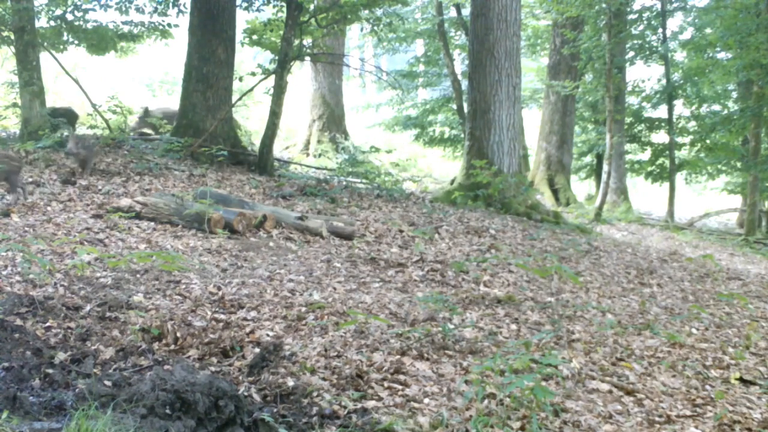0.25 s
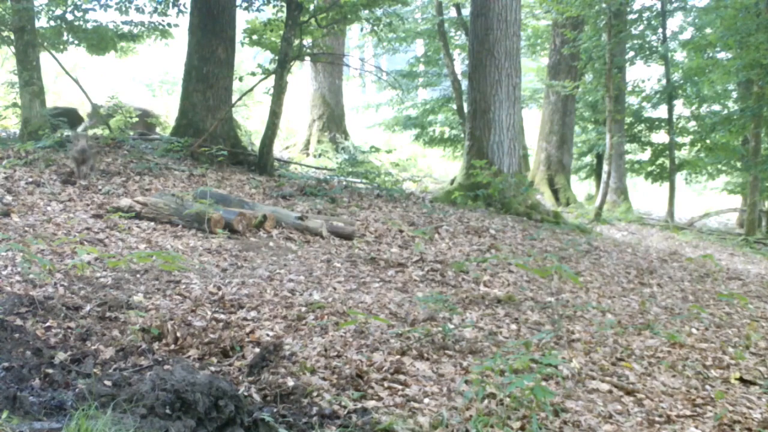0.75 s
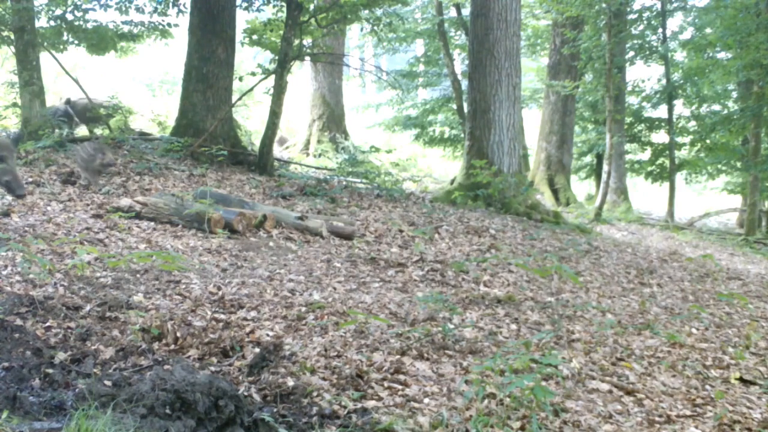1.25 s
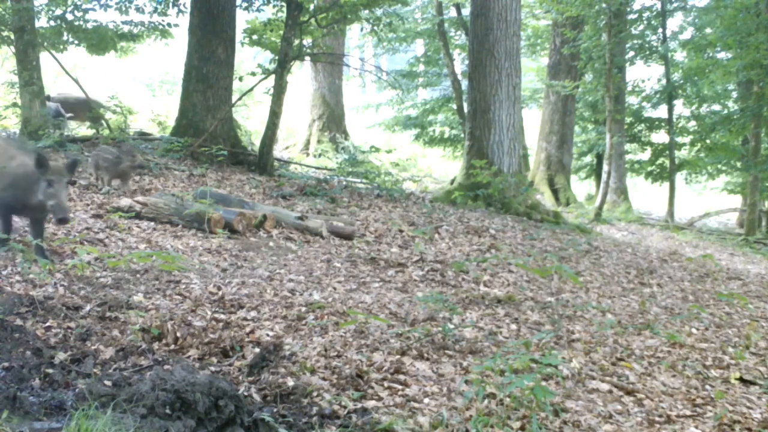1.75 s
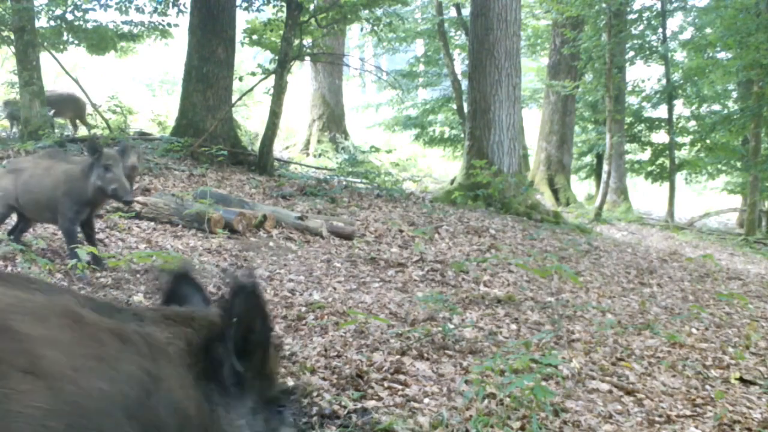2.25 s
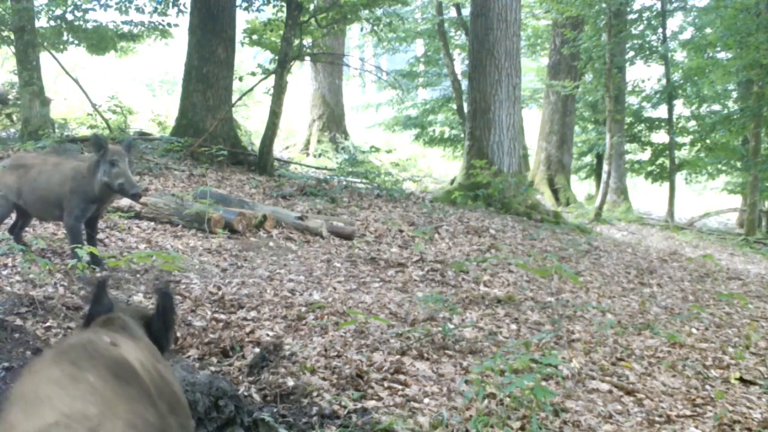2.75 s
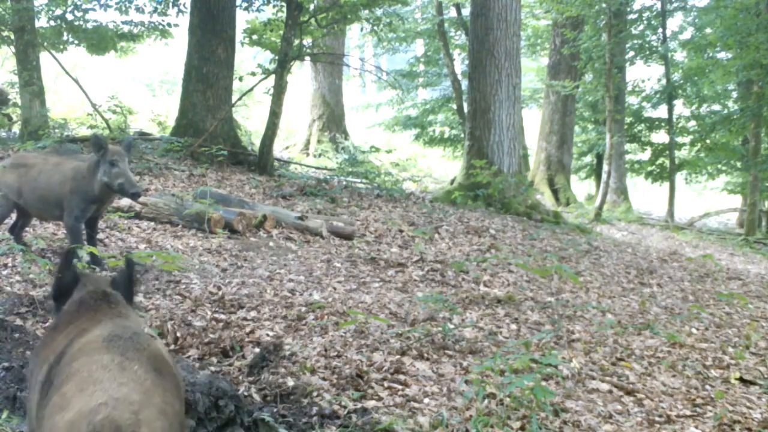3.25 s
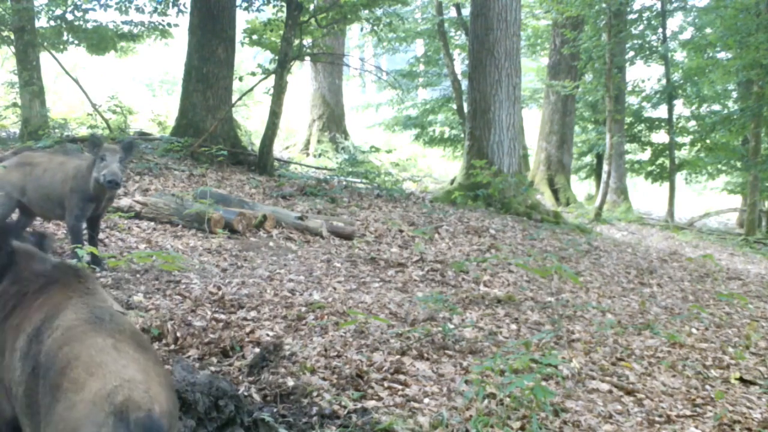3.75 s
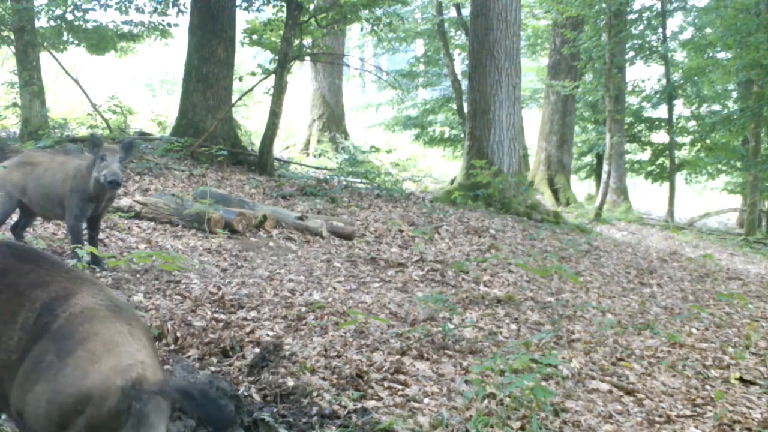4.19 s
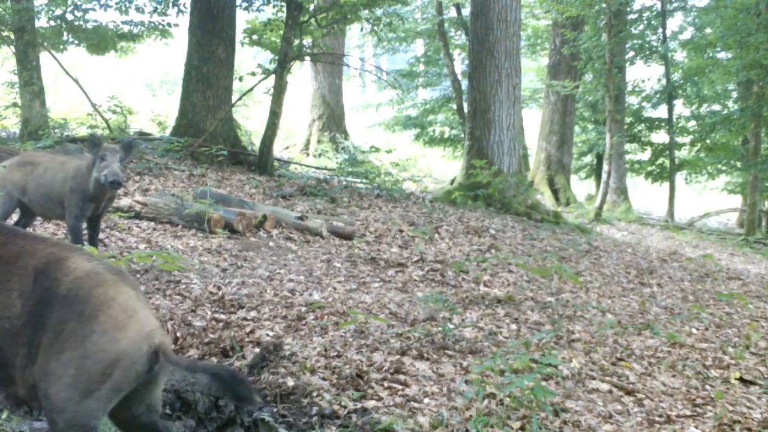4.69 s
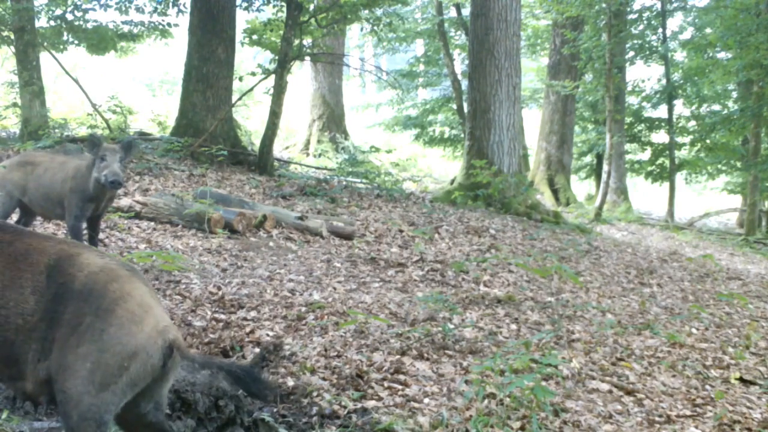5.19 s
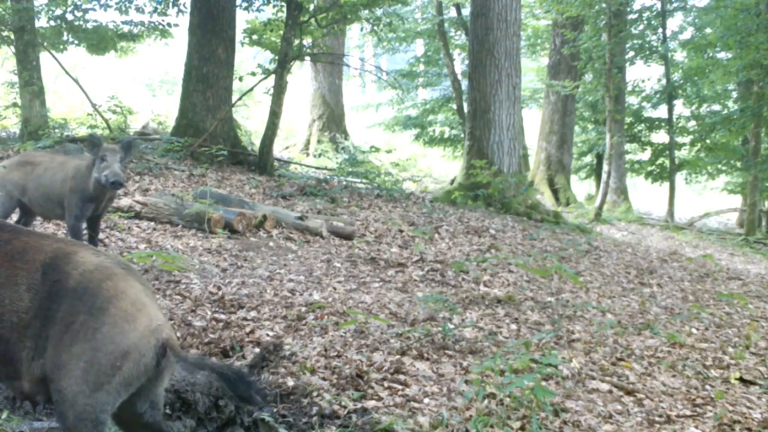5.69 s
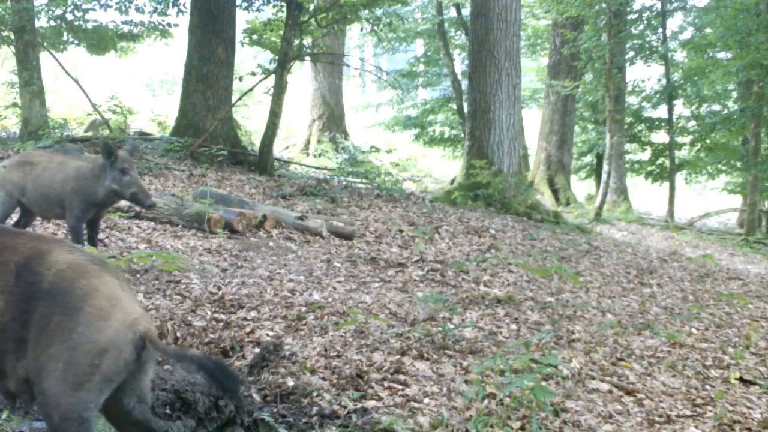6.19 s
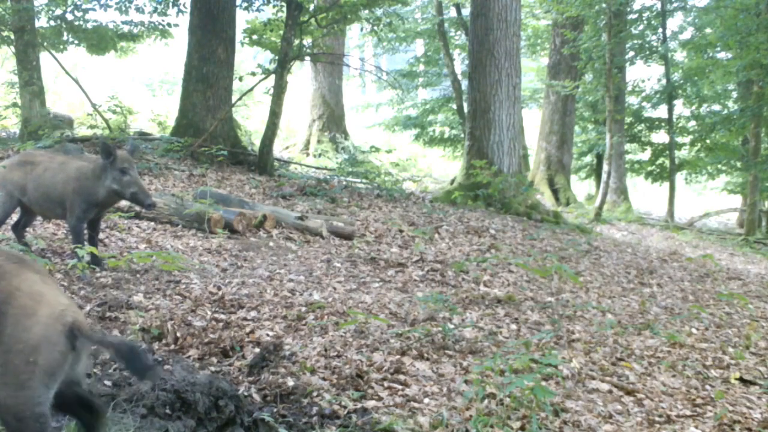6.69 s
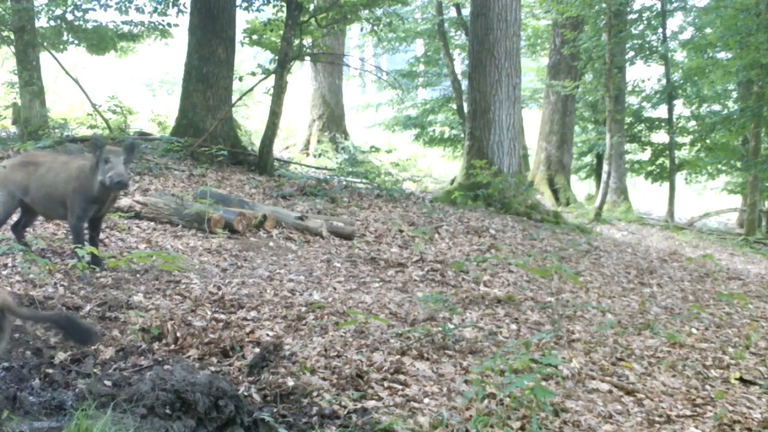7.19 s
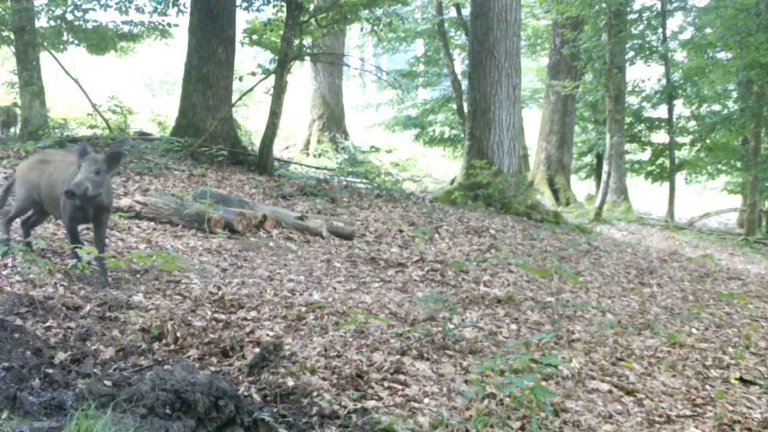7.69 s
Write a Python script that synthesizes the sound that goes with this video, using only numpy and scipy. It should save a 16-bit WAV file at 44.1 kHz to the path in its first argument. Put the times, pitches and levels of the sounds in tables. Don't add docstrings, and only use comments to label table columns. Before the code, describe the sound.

Wild boars rustle through dry leaves and snort close by, bumping the microphone housing with hard knocks before settling into sparse crackles and faint birdsong.

```python
import sys
import numpy as np
from scipy import signal
from scipy.io import wavfile

SR = 44100
rng = np.random.default_rng(int(sys.argv[2]) if len(sys.argv) > 2 else 0)


def wav_record(signal):
    frames = np.transpose(np.atleast_2d(signal))
    bounded = np.clip(frames, -1, 1)
    quanta = np.round(bounded * 32767).astype(np.int16)
    wavfile.write(sys.argv[1], SR, quanta)


def ratio_of_db(decibels):
    return 10 ** (np.asarray(decibels, float) / 20)


N = 350154
TIME = np.arange(N) / SR
SWELL_DB = 15
LEAF_BODY_HZ = 3200

# (time [s], crisp level [dB], nearness as duller body re crisp [dB])
TRAMPLE = [(0, -55.5, -13.5), (.45, -54.5, -10), (.75, -53.5, -12.5), (.95, -61, -6), (1.5, -66, -9.5),
           (2.0, -45.5, -16), (2.6, -49.5, -13), (3.0, -49, -13.5), (3.35, -52, -16.5), (3.6, -58, -10.5),
           (4.55, -60.5, -15), (4.85, -57.5, -15.5), (5.07, -64, -13), (5.75, -69.5, -8), (6.3, -66.5, -10),
           (6.9, -64, -6.5), (7.401, -55.5, -14.5), (7.94, -58, -10)]
TRAMPLE_BRIGHTNESS = [1.5, 1.5, 0.1, -1.5, 1.5, 2.5, 0.1, -1.5, -2.5, -1.5, 0.1, -1.5, 0.1, 0.1, 0.1, 1.5,
                      2.5, 0.1]
# (peak time [s],
# peak level [dB], rise [s], fall [s])
SCUFFS = [(0.031, -43.5, 0.032, 0.029), (.14, -46.5, 0.089, 0.29), (.215, -50, 0.044, 0.16),
          (.88, -56, 0.14, 0.04), (1.022, -37.5, 0.049, 0.038), (1.15, -51, 0.092, .2),
          (1.326, -40, .032, .06), (1.41, -44.5, 0.083, 0.16), (1.53, -33, 0.01, 0.17),
          (1.6, -31, 0.0439, .25), (1.79, -30.5, 0.056, 0.065), (1.907, -33.5, 0.017, .11),
          (1.985, -35.5, 0.055, 0.046), (2.146, -23.5, 0.1, 0.088), (2.33, -39.5, .15, .2),
          (2.43, -42.5, 0.036, 0.17), (2.554, -43.5, 0.071, 0.056), (2.824, -46, .15, 0.032),
          (3.058, -43, .04, 0.089), (4.161, -52.5, 0.095, 0.072), (4.31, -47, .08, 0.05),
          (4.435, -55.5, 0.091, 0.086), (4.674, -56, 0.22, 0.073), (6.38, -58, 0.17, 0.17),
          (6.705, -54.5, 0.11, .25), (6.974, -54, 0.1, .15), (7.129, -55, .12, 0.11),
          (7.343, -51, 0.12, 0.2), (7.613, -51.5, 0.18, .2), (7.847, -53.5, 0.074, 0.092)]
SCUFF_BRIGHTNESS = [1.5, 1.5, 1.5, 0.1, -4, -2.5, 0.1, 3, 1.5, 1.5, 4, 2.5, 4, 4, 1.5, 0.1, -1.5, 0.1, -1.5,
                    -1.5, 0.1, -1.5, 0.1, 1.5, 0.1, 0.1, -1.5, 2.5, 2.5, 0.1]
# (frequency [Hz], density [dB per Hz])
LEAF_CRISP_SPECTRUM = [(2470, -34), (4200, -14.5), (4940, -9.5), (5620, -1.5), (6250, -4), (7500, -3.5),
                       (9670, -10.5), (16000, -26.5)]
# (frequency [Hz], density [dB per Hz])
LEAF_BODY_SPECTRUM = [(700, -26), (1400, -15), (2100, -17), (2800, -3), (3500, 0), (4150, -7), (4800, -26)]
# (frequency [Hz], density [dB per Hz])
AIR_SPECTRUM = [(12, -41.5), (24, -4), (86, -5), (422, -16), (1860, -26.5), (4540, -23.5), (6010, -20.5),
                (16000, -32)]
# (time [s], firing rate [Hz], level [dB rms])
ENGINE = [(0, 88.1, -66), (1.201, 87.6, -60.5), (2.5, 86.75, -70.5), (4.3, 85.3, -64.5), (5.5, 84.95, -65),
          (7.2, 83.74, -67.5), (7.94, 85, -77.5)]
# (time [s], peak level [dB], frequency [Hz],
# t60 [s])
THUMPS = [(0.088, -56, 90, 0.15), (0.969, -38, 38.7, 0.24), (0.999, -52, 32.3, 0.12),
          (1.028, -42.5, 115, 0.12), (1.308, -43, 32.6, 0.19), (0.091, -50.5, 275, 0.05),
          (1.788, -39, 82, 0.05), (1.86, -46, 95.5, 0.091), (2.093, -47.5, 75, 0.33),
          (2.26, -53.5, 68.6, 0.43), (2.419, -46.5, 115, 0.076), (2.449, -51, 32.6, 0.097),
          (5.17, -56.5, 78.2, 0.16)]
# (time [s], peak level [dB], ring [Hz], ground thud re peak [dB])
TICKS = [(0.1511, -32, 7800, -11), (.3433, -41, 6960, -23), (0.4823, -28.5, 7840, -26),
         (0.5798, -34, 6700, -34), (0.6556, -26, 6740, -17), (0.9021, -37, 6500, -24),
         (1.272, -44, 10500, -30), (1.463, -38, 10800, -30), (1.499, -30, 10500, -32),
         (1.8549, -1.5, 7700, -19), (1.8552, -11, 11800, -40), (1.79, -25, 11000, -40),
         (2.2464, -30, 12500, -40), (2.2204, -20, 6700, -34), (1.94, -27, 7800, -34),
         (1.982, -27, 8700, -34), (2.59, -33, 8500, -33), (2.6428, -32, 7000, -33),
         (2.6802, -33, 5680, -33), (2.8778, -36, 7590, -33), (3.536, -38, 7800, -32),
         (3.77, -42, 5900, -32), (3.825, -42, 7800, -32), (4.111, -36, 10000, -35), (4.147, -41, 9500, -35),
         (4.322, -35, 7500, -35), (4.627, -42, 9800, -35), (4.6685, -33, 5930, -35),
         (4.678, -38, 7000, -35), (3.527, -34.5, 7900, -32), (3.7366, -34.5, 7360, -42),
         (3.333, -33, 5800, -36), (3.9802, -38, 7100, -28), (4.2848, -22.5, 8830, -45),
         (4.3081, -21, 7500, -18), (4.4464, -25, 5900, -42.5), (6.955, -37, 5370, -34.5),
         (6.99, -35, 7250, -33), (7.001, -38, 7000, -33), (7.041, -38, 7000, -33), (7.06, -42, 5180, -26),
         (7.15, -42, 6500, -33), (7.414, -36, 6800, -25), (7.357, -21, 6600, -49),
         (7.528, -41.5, 6590, -15.5), (7.6197, -38, 6350, -53), (7.765, -39, 7000, -40),
         (7.858, -38, 5600, -40)]
# (time [s], peak level [dB], ring [Hz], hollow body re peak [dB], thud re peak [dB])
TEARS = [(1.392, -29, 7700, -23, -21), (1.4412, -25, 8000, -16.5, -43), (1.905, -21, 6850, -36, -22.5),
         (2.8066, -31.5, 5950, -9, -16), (3.045, -29, 6690, -9, -17), (7.8355, -27.5, 6300, -10, -24)]
# (time [s], peak level [dB], hollow body [Hz], body re peak [dB], thud re peak [dB])
CRUNCHES = [(2.046, -23, 3250, -5, -23), (2.2464, -30, 3430, -10, -13), (2.4064, -24, 3130, -7, -14),
            (2.4441, -21, 3060, -10, -12), (2.5682, -34, 3590, -6, -33), (2.053, -31, 3300, -3, -25),
            (2.592, -42, 4200, 3, -30), (2.706, -38, 3500, -9, -29), (2.7526, -36.5, 3580, -2, -30),
            (2.8668, -38, 2330, -13, -24), (2.995, -42.5, 2730, -8, -6.5), (3.066, -22.5, 2750, -8, -15),
            (3.321, -46.5, 2360, -5, -30), (3.4274, -42.5, 3900, -2.5, -37), (3.603, -58, 2080, 8, -21),
            (4.112, -42, 2900, -3, -32), (4.339, -47.5, 2830, 8.5, -6), (4.412, -36.5, 2900, -1.5, -20),
            (4.621, -55, 3500, 6, -30), (4.663, -34, 3460, -14, -37), (4.672, -48, 3400, 7, -30),
            (6.6902, -33, 2960, -12.5, -21), (6.718, -38.5, 3300, -1, -27), (6.782, -45, 3440, -3, -25),
            (7.0236, -38.5, 2800, -5, -23.5), (6.9314, -45, 3850, 1.5, -25), (6.957, -46, 2900, 1.5, -25),
            (7.1055, -39, 3140, 5, -25), (7.413, -48, 3000, 5, -20), (7.602, -62, 1100, 10, -9),
            (7.794, -57, 1300, 10, -9), (7.065, -62, 1300, 9, -9), (7.135, -63, 1350, 9, -9),
            (4.428, -63, 1400, 9, -9), (6.597, -62, 2150, 8, -9), (7.7842, -40.5, 3350, 5, -19),
            (7.7974, -43, 2930, 2, -15)]
# (time [s], peak level [dB], treble tilt [dB], scrape [s], low push re peak [dB])
KNOCKS = [
    (0.779, -37, -39, 0.0018, 11.5),
    (0.812, -11, -15, 0.0016, -11),
    (0.9187, -38, -28, 0.002, 8),
    (0.934, -44, -30, 0.003, 5),
    (1.159, -14.5, -12, 0.0026, -8),
    (1.171, 0.8, 0, .0029, -27),
    (1.283, -36.5, -7, 0.00039, 13.5),
    (1.5633, -13, -10, 0.0013, -5.5),
]
# (frequency [Hz], density [dB per Hz])
CRACK_SPECTRUM = [(150, -32), (450, -14.5), (620, -26), (881, -13), (1400, -16), (2700, -4), (6600, -6.5),
                  (14000, -40)]
# (frequency [Hz], level [dB], t60 [s])
HOUSING_BRACKET_MODES = [(775, -15, 0.09), (1093, -16, 0.044), (1405, -15, 0.082), (1755, -5, 0.03),
                         (2175, -13, 0.059), (2299, -10, 0.066), (2478, -16, 0.06), (2562, -19, 0.075),
                         (2702, -24, 0.065), (3063, -19, 0.063), (3359, -13, 0.076),
                         (3623, -9, 0.076), (3908, -6, 0.12), (4113, -8, 0.087), (4420, -23, 0.1),
                         (5362, -19, 0.11), (5986, -3, 0.12), (6272, -15, 0.12), (6422, -3, 0.068),
                         (7117, -6, 0.083), (7515, -10, 0.2), (8199, -16, 0.1), (8818, -11, 0.1), (9292, -16, 0.13),
                         (9814, -14, 0.13)]
# (frequency [Hz], level [dB], t60 [s])
CAVITY_MODES = [(803, 7, .03), (1003, 6, .03)]
# (peak time [s], level [dB], rise [s], fall [s])
SNORTS = [
    (1.011, -37, 0.047, .062),
    (1.332, -42.5, .033, 0.035),
    (1.555, -36.5, 0.043, .26),
    (1.73, -46, .13, .12),
    (2.13, -59, 0.067, 0.11),
    (3.166, -58.5, 0.013, 0.026),
    (4.26, -61, 0.08, 0.06),
    (4.305, -56, 0.035, 0.045),
    (6.36, -53.5, .115, .23),
    (7.025, -61, 0.058, .075),
]
# (snout frequency factor [ratio], upper resonances [dB], nostril hiss [dB], puff on microphone [dB])
SNORT_MANNERS = [(1.24, -5, -17, 1), (1.35, -35, -15, -4.5), (1.5, -3, -4.5, -44), (1.6, 11, -14, -44),
                 (1.2, 2, -11, 5.5), (1.5, 13, -0.5, -12), (0.9, -4, -16, -12), (0.75, 11, -12, -14),
                 (0.96, 8.5, 3, -22), (0.69, -10, -18, -19)]
# (frequency [Hz], width [Hz], level [dB])
SNOUT_RESONANCES = [(306.5, 390, 8.5), (435, 170, 9), (1060, 250, 3.5), (1290, 190, 4)]
# (frequency [Hz], width [Hz], level [dB])
NOSTRIL_RESONANCES = [(2050, 500, -11), (2830, 420, 0), (3400, 340, -1.5), (5350, 500, -7), (6500, 500, -3),
                      (7150, 400, -3), (9200, 800, -13), (10900, 500, -17), (12600, 500, -21)]
# (start [s], end [s], first pitch [Hz], last pitch [Hz], level [dB rms])
BIRD_NOTES = [(3.53, 3.69, 3700, 3700, -76), (3.7, 3.87, 7250, 7200, -62), (3.87, 4.13, 7240, 7230, -62),
              (4.05, 4.37, 5190, 5170, -62), (4.74, 5.1, 5580, 5620, -63), (4.92, 5.04, 7220, 7330, -65),
              (5.0, 5.26, 7440, 7420, -65), (5.16, 5.26, 4860, 4855, -70), (5.26, 5.35, 4860, 4855, -70),
              (5.37, 5.47, 4855, 4850, -73), (5.88, 5.94, 3570, 3900, -78), (5.93, 5.965, 3900, 4500, -73),
              (5.3, 5.62, 3620, 3580, -82), (5.68, 5.82, 2900, 2900, -82), (6.88, 7.1, 4180, 4190, -76),
              (7.05, 7.32, 5150, 5130, -67)]


def evened(x):
    return x / np.sqrt(np.mean(x ** 2) + 1e-20)


def add(mix, s, sound):
    part = mix[round(s * SR):][:len(sound)]
    part += sound[:len(part)]


def taps_of(points, size=2048):
    f, db = np.transpose(points)
    hz = abs(np.fft.fftfreq(2 * size, 1 / SR))
    log_gain = np.log(ratio_of_db(np.interp(np.log(hz + 1), np.log(f + 1), db)))
    taps = np.fft.ifft(np.exp(np.conj(signal.hilbert(log_gain)))).real[:size]
    return taps / np.linalg.norm(taps)


def resonate(x, hz, width):
    turn = np.exp(2j * np.pi * np.cumsum(hz * np.ones(len(x))) / SR)
    r = np.exp(-np.pi * width / SR)
    return 2 * (turn * signal.lfilter([1 - r], [1, -r], x / turn)).real


def resonate_twice(x, hz, width, second_width):
    return resonate(resonate(x, hz, width), hz, second_width)


def wobble(count, hz):
    slow = signal.butter(2, hz, fs=SR, output="sos")
    return evened(signal.sosfilt(slow, rng.standard_normal(count)))


def swell(t, peak, db, rise, fall, bend):
    return db - SWELL_DB * (abs(t - peak) / np.where(t < peak, rise, fall)) ** bend


def shuffle():
    s, bed_db, near_db = np.transpose(TRAMPLE)
    t = TIME[::32]
    bed = ratio_of_db(2 * np.interp(t, s, bed_db))
    strokes = np.array([ratio_of_db(2 * swell(t, *row, bend=1.4)) for row in SCUFFS])
    power = bed + strokes.sum(0)
    bed_bright = bed * np.interp(t, s, TRAMPLE_BRIGHTNESS)
    bright_db = (bed_bright + np.array(SCUFF_BRIGHTNESS) @ strokes) / power
    crisp_db = np.interp(TIME, t, 10 * np.log10(power))
    return crisp_db, np.interp(TIME, s, near_db), np.interp(TIME, t, bright_db)


def crackle(crisp_db, low_hz, high_hz, per_s, spread_db, patch_db, count):
    force_db = crisp_db + 40.5
    hiss = 1 + .25 * ratio_of_db(force_db)
    clumps = wobble(N, hz=40)
    out = np.zeros(N)
    for hz in np.geomspace(low_hz, high_hz, count):
        size = ratio_of_db(spread_db * np.minimum(rng.exponential(1, N), 5)) * rng.choice([-1., 1.], N)
        clicks = evened(size * (rng.random(N) < per_s / SR)) + hiss * rng.standard_normal(N)
        brighter_db = .29 * force_db * max(np.log2(hz / 8000), 0)
        patch = ratio_of_db(patch_db * (wobble(N, hz=3) + clumps) + brighter_db)
        band = signal.butter(2, [hz / 1.13, hz * 1.13], "band", fs=SR, output="sos")
        out += signal.sosfilt(band, patch * clicks / np.sqrt((1 + hiss ** 2) * hz))
    return out


def leaves():
    crisp_db, near_db, bright_db = shuffle()
    crisp = crackle(crisp_db, 4200, 15000, per_s=550, spread_db=3.3, patch_db=1.7, count=7)
    body = crackle(crisp_db, 1300, 4200, per_s=250, spread_db=3.7, patch_db=2.2, count=5)
    crisp = evened(signal.oaconvolve(crisp, taps_of(LEAF_CRISP_SPECTRUM))[:N])
    under = signal.sosfiltfilt(signal.butter(4, 6400, fs=SR, output="sos"), crisp)
    crisp = ratio_of_db(-bright_db / 2) * under + ratio_of_db(bright_db / 2) * (crisp - under)
    body = evened(signal.oaconvolve(body, taps_of(LEAF_BODY_SPECTRUM))[:N])
    mould = evened(resonate(rng.standard_normal(N) * ratio_of_db(3.7 * wobble(N, hz=40)), 950, 730))
    return ratio_of_db(crisp_db) * (crisp + ratio_of_db(near_db) * (body + ratio_of_db(-10.5) * mould))


def air():
    return ratio_of_db(-63.5) * signal.oaconvolve(rng.standard_normal(N), taps_of(AIR_SPECTRUM, size=8192))[:N]


def drone():
    s, *columns = np.transpose(ENGINE)
    hz, db = (np.interp(TIME, s, c) for c in columns)
    turns = np.cumsum(hz + .7 * wobble(N, hz=3)) / SR
    second_db = -7 - 20 * np.clip((TIME - 1) / .1, 0, 1)
    orders = np.sin(2 * np.pi * turns) + ratio_of_db(second_db) * np.sin(4 * np.pi * turns)
    return np.sqrt(2) * ratio_of_db(db + .53 * wobble(N, hz=4.5)) * orders


def thump(s, peak_db, hz, t60):
    t = np.arange(SR // 3) / SR
    shape = np.sin(2 * np.pi * hz * t) * (1 - np.exp(-t / .0043)) * ratio_of_db(-60 * t / t60)
    return s, ratio_of_db(peak_db) * shape / abs(shape).max()


def snap(s, peak_db, hz, body_hz, body_db, low_db, t60):
    t = np.arange(SR // 10) / SR
    decay = ratio_of_db(-60 * t / t60) + ratio_of_db(-25.5 - 60 * t / .14)
    burst = rng.standard_normal((3, len(t))) * decay
    burst[:, :8] += 1.7 * burst.max() * np.hanning(8) * np.cos(2 * np.pi * hz * t[:8])
    litter = np.convolve(burst[0], taps_of(LEAF_CRISP_SPECTRUM, size=128))[:len(t)]
    crisp = resonate_twice(burst[0], hz, 1560, 3300) + .094 * litter
    body = resonate_twice(burst[1], body_hz, 690, 1250)
    thud = resonate(resonate(burst[2], 340, 720), 1120, 1700)
    parts = (crisp, 0), (body, body_db), (thud, low_db)
    return s, sum(ratio_of_db(peak_db + db) * part / abs(part).max() for part, db in parts)


def tick(s, peak_db, hz, thud_db):
    return snap(s, peak_db, hz, LEAF_BODY_HZ, -24, thud_db, t60=.0062)


def crunch(s, peak_db, body_hz, body_db, thud_db):
    return snap(s, peak_db, 6370, body_hz, body_db, thud_db, t60=.027)


def tear(s, peak_db, hz, body_db, thud_db):
    return snap(s, peak_db, hz, LEAF_BODY_HZ, body_db, thud_db, t60=.089)


def knock(s, peak_db, tilt_db, scrape, push_db):
    t = np.arange(SR // 4) / SR
    rattle = .012 * np.exp(-t / .0084)
    blow = t / scrape * (np.exp(-t / scrape) + rattle)
    crack = np.convolve(blow * rng.standard_normal(len(t)), taps_of(CRACK_SPECTRUM, size=512))[:len(t)]
    dull = signal.sosfilt(signal.butter(8, 3950 + 40 * tilt_db, fs=SR, output="sos"), crack)
    crack = dull + ratio_of_db(1.4 * tilt_db) * (crack - dull)
    low_db, high_db = 5.5 - .5 * abs(tilt_db + 14), 2.2 * tilt_db
    modes = [(f, db + (high_db if f > 3500 else low_db), t60) for f, db, t60 in HOUSING_BRACKET_MODES]
    modes += [(f, db + .6 * tilt_db, t60) for f, db, t60 in CAVITY_MODES]
    ring = sum(ratio_of_db(db - 60 * t / t60) * np.sin(2 * np.pi * (f * t + rng.random())) for f, db, t60 in modes)
    push = np.sin(2 * np.pi * 230 * t) * t / .0074 * np.exp(1 - t / .0018)
    sound = crack + .18 * ring * (1 - np.exp(-t / .002))
    return s, ratio_of_db(peak_db) * (sound / abs(sound).max() + ratio_of_db(push_db) * push)


def snort(row, snout, upper_db, hiss_db, puff_db):
    peak, _, rise, fall = row
    start = peak - 2 * rise
    t = np.arange(start, peak + 1.2 * fall, 1 / SR)
    breath_db = swell(t, *row, bend=3)
    flaps = np.cumsum(155 + 11.78 * wobble(len(t), hz=22)) / SR
    jet = rng.standard_normal((3, len(t))) * (1 + .28 * np.cos(2 * np.pi * flaps))
    late = np.clip((t - peak) / fall, 0, 1)
    fade = ratio_of_db(-SWELL_DB * .9 * late ** 2)
    shift = snout * (1 - .3 * late ** 2)
    tremble = 1 + .025 * wobble(len(t), hz=25)
    low = sum(ratio_of_db(db) * resonate_twice(jet[0], f * shift, w * snout, 1.1 * w * snout)
              for f, w, db in SNOUT_RESONANCES[:2])
    low = signal.sosfilt(signal.butter(2, 130 * snout, "high", fs=SR, output="sos"), low)
    low += fade * sum(ratio_of_db(db + upper_db) * resonate_twice(jet[0], f * tremble, w, 1.1 * w)
                      for f, w, db in SNOUT_RESONANCES[2:])
    high = sum(ratio_of_db(db) * resonate_twice(jet[1], f * tremble, w, 1.5 * w) for f, w, db in NOSTRIL_RESONANCES)
    rush = resonate(resonate(jet[2], 6040, 1260), 3730, 3120)
    puff = evened(resonate(jet[2], 184, 170)) + ratio_of_db(1) * evened(rush)
    breath = evened(low) + fade * (ratio_of_db(hiss_db) * evened(high) + ratio_of_db(puff_db) * puff)
    return start, ratio_of_db(breath_db) * breath * signal.windows.tukey(len(t), .1)


def note(start, end, first_hz, last_hz, db):
    t = np.arange(0, end - start, 1 / SR)
    depth = .12 + (first_hz / 6950) ** 4
    warble = depth * np.sin(2 * np.pi * np.cumsum(115 + 55 * wobble(len(t), hz=40)) / SR)
    phase = 2 * np.pi * np.cumsum(np.linspace(first_hz, last_hz, len(t))) / SR + warble
    level = ratio_of_db(-6 * t / t[-1] + 4 * wobble(len(t), hz=35))
    song = np.sin(phase) * level * signal.windows.tukey(len(t), .25)
    lag = np.arange(SR // 5) / SR
    echoes = rng.standard_normal(len(lag)) * (rng.random(len(lag)) < .01) * ratio_of_db(-16 - 60 * lag / .35)
    echoes[0] = 1
    return start, ratio_of_db(db) * evened(signal.fftconvolve(song, echoes))


def scene():
    mix = leaves() + air() + drone()
    sources = ((thump, THUMPS), (tick, TICKS), (crunch, CRUNCHES), (tear, TEARS),
               (knock, KNOCKS), (note, BIRD_NOTES))
    for source, table in sources:
        for row in table:
            add(mix, *source(*row))
    for row, manner in zip(SNORTS, SNORT_MANNERS):
        add(mix, *snort(row, *manner))
    return mix[None]


def low_pass(x):
    return signal.sosfilt(signal.butter(12, 16810, fs=SR, output="sos"), x)


def record(dry):
    direct = dry[0]
    ported = direct - .42 * resonate(direct, 3900, 260) - .4 * resonate(direct, 9900, 1100)
    ported = ported + .35 * resonate(ported, 11300, 700)
    limited = np.tanh(ported[None] / .93)
    edge = signal.firwin(255, 15900, window=("kaiser", 8), fs=SR)
    return low_pass(signal.oaconvolve(limited, edge[None], "same"))


dry = scene()
out = record(dry)
wav_record(out)
```